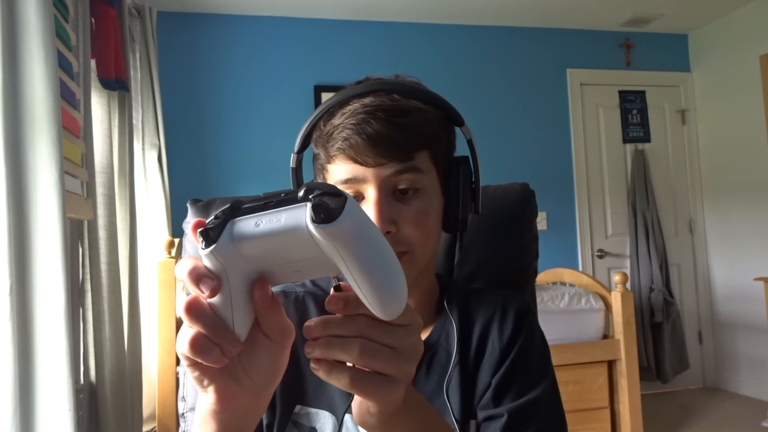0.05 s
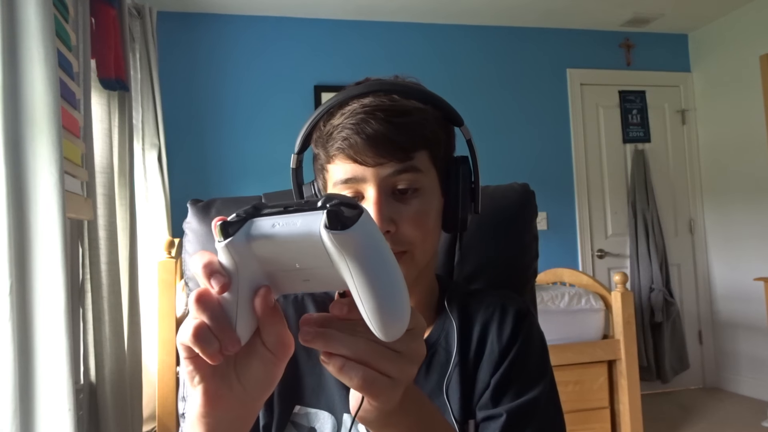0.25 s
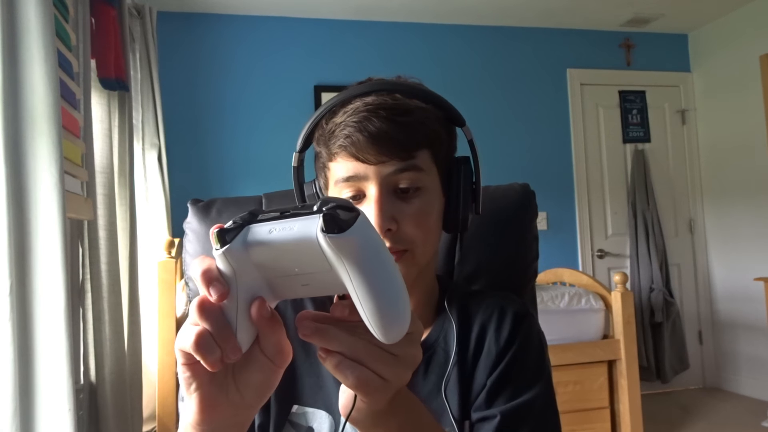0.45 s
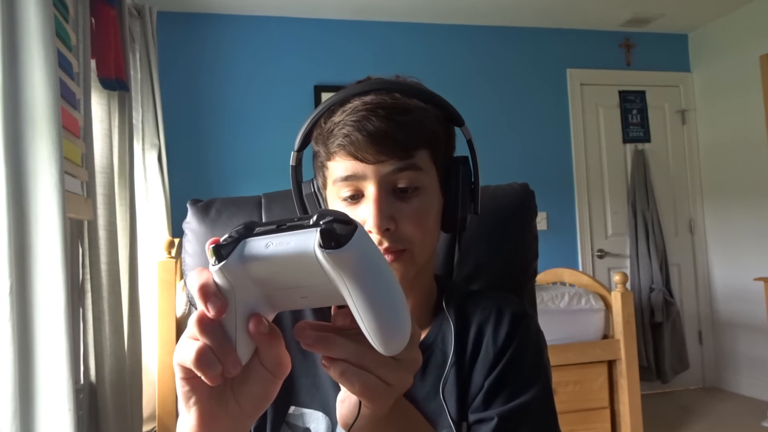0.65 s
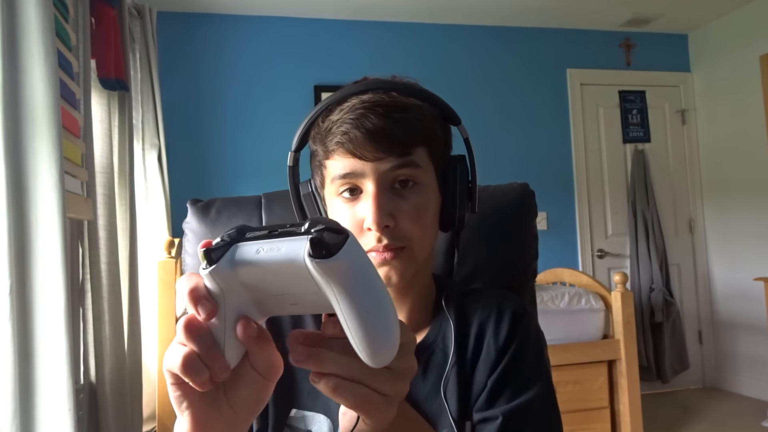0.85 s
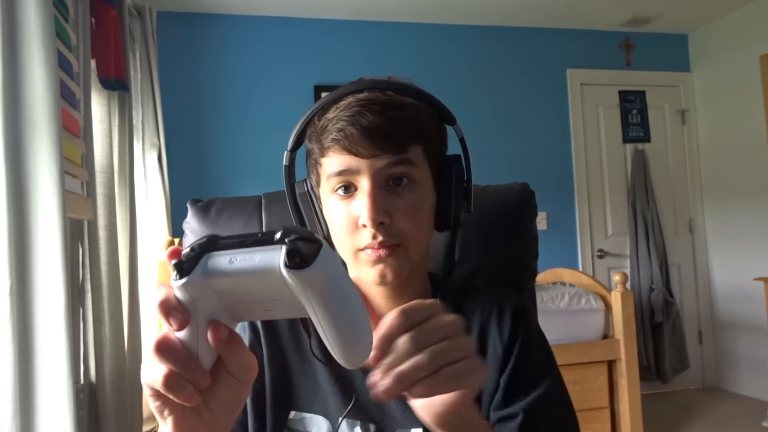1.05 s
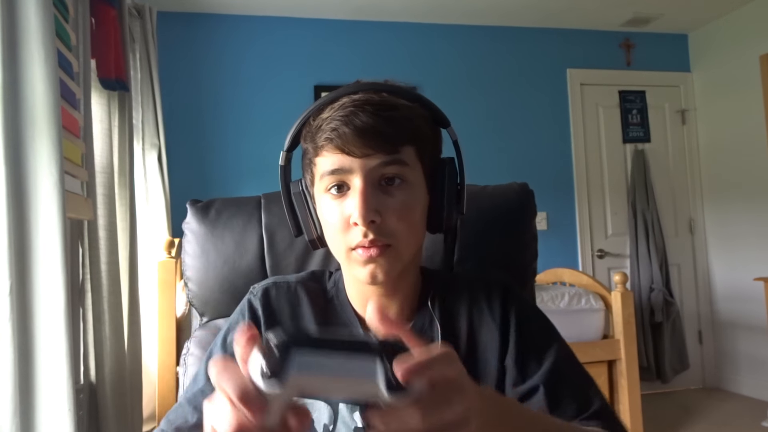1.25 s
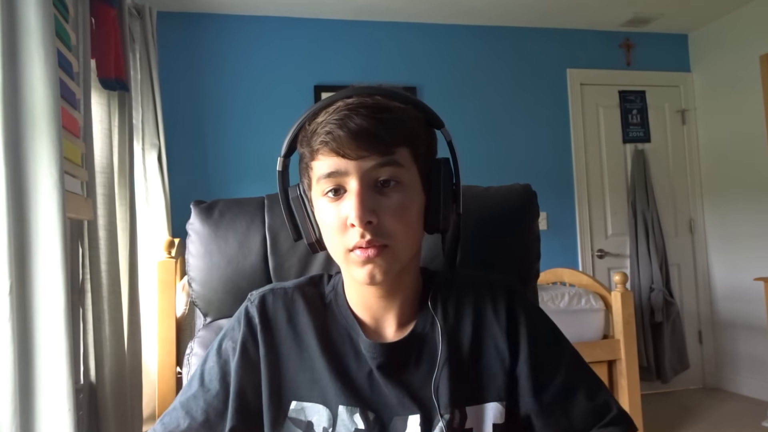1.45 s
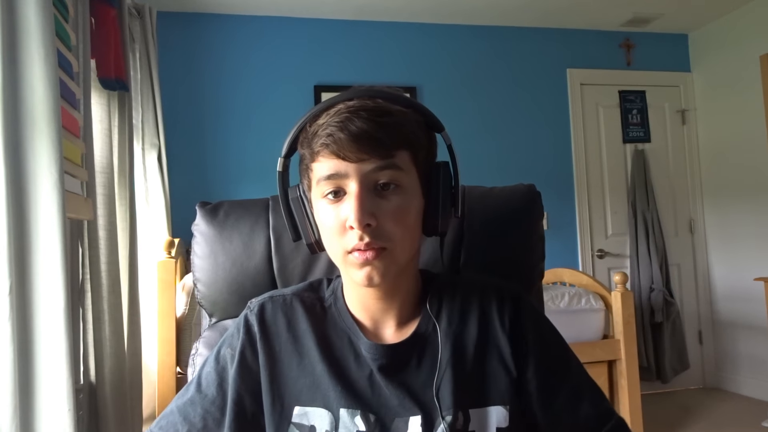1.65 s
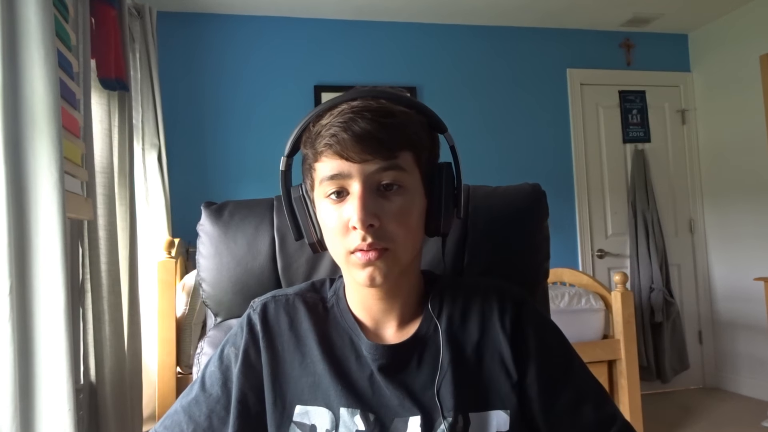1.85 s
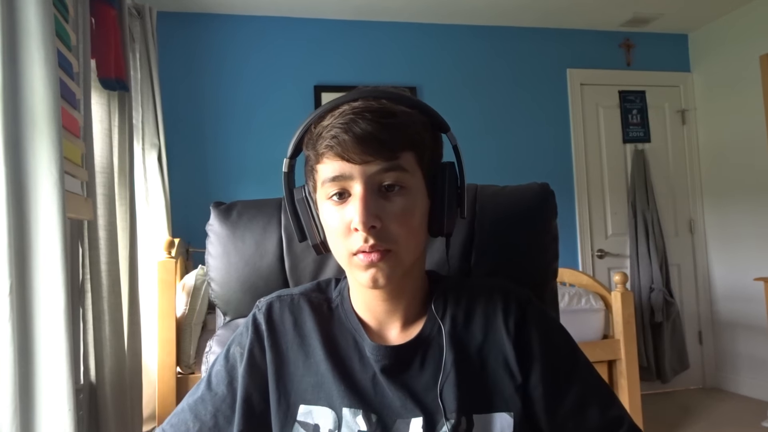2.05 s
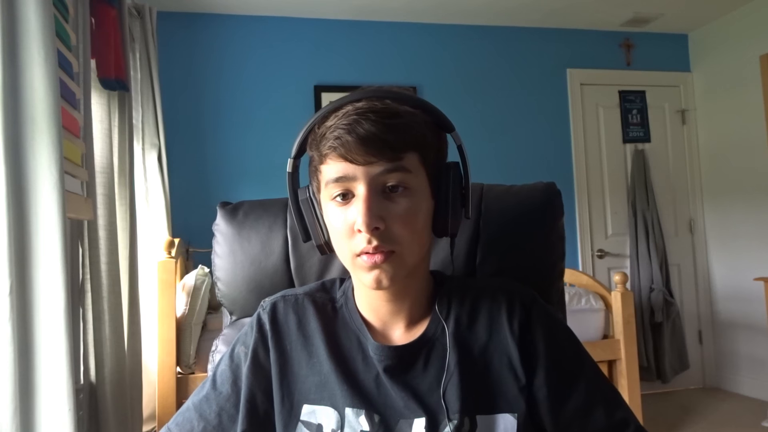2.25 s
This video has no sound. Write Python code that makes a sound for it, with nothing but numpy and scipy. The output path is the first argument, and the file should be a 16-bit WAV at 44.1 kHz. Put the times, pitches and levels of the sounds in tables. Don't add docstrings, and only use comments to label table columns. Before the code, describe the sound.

Game controller plastic clicks and snaps as a plug goes in, then handling knocks and a press

```python
import sys
import numpy as np
from scipy import signal
from scipy.fft import rfft, irfft, next_fast_len
from scipy.io import wavfile
from scipy.ndimage import uniform_filter1d

SR = 44100
rng = np.random.default_rng(int(sys.argv[2]) if len(sys.argv) > 2 else 0)


def generate_wav(signal):
    frames = np.transpose(np.atleast_2d(signal))
    scaled = np.clip(frames, -1, 1) * 32767
    pcm = np.round(scaled).astype(np.int16)
    wavfile.write(sys.argv[1], SR, pcm)


def volts_from_db(level):
    exponent = np.asarray(level, float) / 20
    return 10 ** exponent


N = 99225


def unit(x):
    return x / np.sqrt(np.mean(x ** 2) + 1e-20)


def peak(x):
    return x / np.abs(x).max()


def along(points, hz):
    f, v = np.transpose(points)
    return np.interp(np.log(hz + 1), np.log(f + 1), v)


def filtered(x, response):
    m = 2 * next_fast_len(x.shape[-1] // 2 + SR // 8)
    return irfft(rfft(x, m) * response(np.fft.rfftfreq(m, 1 / SR)), m)[..., :x.shape[-1]]


def causal(points):
    def response(hz):
        cepstrum = irfft(np.log(volts_from_db(along(points, hz)) + 1e-6))
        half = len(cepstrum) // 2
        cepstrum[1:half] *= 2
        cepstrum[half + 1:] = 0
        return np.exp(rfft(cepstrum))
    return response


def spread(pair, alike):
    def mid_and_side(hz):
        turn = np.arccos(np.clip(along(alike, hz), -1, 1)) / 2
        return np.array([np.cos(turn), np.sin(turn)])
    mid, side = filtered(pair, mid_and_side)
    return np.array([mid + side, mid - side])


def steady_noise(spectrum, db):
    # frequency in Hz, left-right likeness.
    likeness = [(60, 0.9), (230, 1), (870, 0.12), (3320, 0.05), (12700, 0.013)]
    noise = filtered(rng.standard_normal((2, N)), lambda hz: volts_from_db(along(spectrum, hz)))
    return volts_from_db(db) * unit(spread(noise, likeness))


def hiss():
    # frequency in Hz, level in dB per Hz.
    hiss_spectrum = [(200, -33.5), (400, -13), (640, -2), (2000, -4.5), (4400, -7), (6300, -11.5),
                     (10900, -19), (11600, -68)]
    return steady_noise(hiss_spectrum, -63)


def rumble():
    # frequency in Hz, level in dB per Hz.
    rumble_spectrum = [(20, -18), (100, -9), (300, 0), (450, -6), (900, -80)]
    return steady_noise(rumble_spectrum, -90.5)


def resonant(x, peaks):
    def response(f):
        return sum((-1) ** k * volts_from_db(db) * 1j * f * width / (hz * hz - f * f + 1j * f * width)
                   for k, (hz, width, db) in enumerate(peaks))
    return filtered(x, response)


def blurred(peaks):
    widen = 1.075
    def response(f):
        return np.sqrt(sum(volts_from_db(2 * db) / (1 + ((hz * hz - f * f) / (f * width * widen + 1)) ** 2)
                           for hz, width, db in peaks))
    return response


def contacts(rows, shell, wet_db, shift):
    # frequency in Hz, width in Hz, level in dB.
    cavity = [(900, 100, 0), (1090, 70, -7), (780, 150, -12)]
    # frequency in Hz, level in dB.
    crack_colour = [(400, -44), (800, -12), (2000, 5.5), (4000, 9.5), (8000, -9.5), (11000, -18),
                    (14000, -33), (20000, -22)]
    blow_s, crack_s = 0.0015, 0.0071
    roughness, ring_db = 0.25, 0.5
    first_answer_s = 0.0025
    round_hollow_db, round_crack_db = 17, -0.7

    toward, kicks = np.zeros(N + SR), np.zeros((3, N))
    t = np.arange(SR // 10) / SR
    hollow = [(hz * shift, width, db) for hz, width, db in cavity]
    for s, db, hollow_db, crack_db in rows:
        push = volts_from_db(-20 * t / blow_s) * roughness * rng.standard_normal(len(t)) + (t == 0)
        crack = filtered(volts_from_db(-20 * t / crack_s) * rng.standard_normal(len(t)), causal(crack_colour))
        sound = peak(resonant(push, shell))
        sound = sound + volts_from_db(hollow_db) * peak(resonant(push, hollow))
        sound = sound + volts_from_db(crack_db) * peak(crack)
        toward[round(s * SR):][:len(t)] += volts_from_db(db + ring_db) * sound
        parts_db = np.array([0, hollow_db + round_hollow_db, crack_db + round_crack_db])
        kicks[:, round((s + first_answer_s) * SR)] = volts_from_db(db + parts_db)

    def colours(f):
        return np.array([blurred(shell)(f), blurred(hollow)(f), volts_from_db(along(crack_colour, f))])
    return toward[:N], volts_from_db(wet_db + 18) * filtered(kicks, colours).sum(axis=0)


def room(toward, around):
    # frequency in Hz, time to fall 60 dB in seconds.
    decay = [(500, 0.49), (1300, 0.35), (3000, 0.32), (4400, 0.38), (6000, 0.36), (9000, 0.28)]
    # frequency in Hz, level of the tail in dB.
    tail_colour = [(10800, 30), (11500, -33)]
    # frequency in Hz, left-right likeness of the tail.
    tail_alike = [(500, 0.87), (2500, 0.59), (4500, 0.063), (10000, 0.05)]
    # delay in seconds, level in dB over the tail.
    reflections = [
        (.005, 8),
        (0.015, 6),
        (0.029, -4.5),
    ]
    # frequency in Hz, angle in radians by which each microphone port is turned.
    port_phase = [(2500, 0.15), (4500, 0.6), (10000, 0.84)]
    left_db, left_treble_db = 0.96, -0.5
    start_s, rise_s, wall_rise_s, scatter_s = 0.0013, 0.018, 0.0009, 0.0032

    hz, t, z = signal.stft(rng.standard_normal((2, SR // 2)), SR, nperseg=256)
    fall_db = along(tail_colour, hz)[:, None] - 60 * t / along(decay, hz)[:, None]
    tail = signal.istft(z * volts_from_db(fall_db), SR, nperseg=256)[1]
    t = np.arange(tail.shape[1]) / SR
    walls = sum(volts_from_db(db) * np.clip((t - s) / wall_rise_s, 0, 1) * np.exp(-np.abs(t - s) / scatter_s)
                for s, db in reflections)
    tail = spread(tail, tail_alike) * (np.clip((t - start_s) / rise_s, 0, 1) + walls)

    def ports(hz):
        sign = np.array([[1], [-1]])
        lean = along([(2000, left_db), (11000, left_db + left_treble_db), (12000, 4.8)], hz)
        return volts_from_db(sign * lean) * np.exp(1j * sign * along(port_phase, hz))
    answer = signal.fftconvolve(around[None], tail / np.linalg.norm(tail[0]), axes=1)[:, :N]
    return filtered(toward, ports) + answer


def handled(rows, shell, group):
    # plug in, snap, fumble, grip, knock, press, scrape.
    # Strength of the room's answer in dB.
    wet_db = [-8.5, -7.5, -11.5, -12.5, -12.5, -10, -10]
    hollow_shift = [1.05, 0.97, 0.89, 0.96, 0.99, 1.03, .95]
    dull_db = [-6, 0, -1, -1, 0.5, -1, -3]
    heard = room(*contacts(rows, shell, wet_db[group], hollow_shift[group]))
    shade = dull_db[group]
    return filtered(heard, causal([(5000, 0), (8000, shade), (13000, 2 * shade)]))


def scrape():
    blows = [(0.2324, -32.5, -25, 0.5), (0.2339, -29.5, -13.5, -3), (0.2364, -31.5, -15, -8),
             (.239, -38, -4, -11), (.245, -31.5, -16, -12), (0.248, -35.5, -28, -10),
             (0.2571, -39, -8, -10), (0.2584, -33, -16, -8), (0.2605, -31, -8.5, -14),
             (0.2606, -27, -15, -19)]
    shell = [(1750, 450, 2), (2400, 500, 4), (3100, 550, 5), (3800, 500, -2), (4700, 400, -3)]
    return handled(blows, shell, 6)


def plug_in():
    blows = [(0.2711, -21.5, -19.5, -7), (0.2735, -23.5, -23, -14), (0.2772, -21, -38, -2.5),
             (0.278, -14.5, -34, -4.5), (.279, -20.5, -21, -8), (0.2926, -18.5, -22, -11.5),
             (0.2953, -24, -21, -8), (.2985, -26, -14.5, -18), (.3025, -22.5, -32, -2.5)]
    shell = [(1950, 200, -7), (2300, 250, -12), (2910, 150, 0), (3450, 350, -10), (4180, 300, -5),
             (5000, 700, -21), (7240, 900, -25)]
    return handled(blows, shell, 0)


def snap():
    blows = [(0.5844, -14, -23.5, -9), (.5856, -19.5, -30, -21), (0.5899, -27.5, -7, -18),
             (.5925, -34.5, -13, -15), (.605, -28, -25, -3.5), (.6155, -26.5, -24, -7),
             (.637, -30.5, -15, -8)]
    shell = [(1850, 330, 8), (2500, 330, 5), (3280, 500, -8), (4730, 500, -2), (6200, 600, -2),
             (8260, 1800, -5)]
    return handled(blows, shell, 1)


def fumble():
    blows = [(.848, -63, -29, 9), (.853, -55, -28, 5), (0.9312, -45.5, -9.5, -31), (0.989, -55, -11, 5.5),
             (1.002, -48.5, -2, -22), (1.021, -41.5, -6, -3), (1.0252, -46, 9, -14), (1.046, -38, -15, -13),
             (1.0478, -41, -18, -11), (1.073, -50, -2, -15)]
    shell = [(1850, 260, 6), (3000, 260, 5), (3700, 400, -4)]
    return handled(blows, shell, 2)


def grip():
    blows = [(1.2171, -34, -25, -6), (1.222, -29.5, -14, -3.5), (1.227, -30.5, -22, -19),
             (1.233, -29.5, -36, -25), (1.239, -44, -13, -24), (1.4135, -44, -15, 1)]
    shell = [(1600, 300, -2), (2300, 400, 3), (3010, 300, 11), (4000, 700, 4), (6330, 600, -8),
             (7700, 700, -2)]
    return handled(blows, shell, 3)


def knock():
    blows = [(1.5775, -25.5, -12, -6), (1.5783, -8.5, -18.5, -10.5), (1.582, -22, -8, -14),
             (1.5863, -22.5, -15.5, -4), (1.597, -28, -10, -13), (1.608, -26, -20, -18),
             (1.653, -32, -18, -21), (1.6605, -41, 0.5, -5), (1.666, -44, 5.5, -2)]
    shell = [(1750, 260, 1), (2200, 280, 0), (2940, 500, 3), (3650, 500, 0), (4400, 550, -2),
             (5520, 450, -12), (7140, 400, -17)]
    return handled(blows, shell, 4)


def press():
    blows = [(1.9734, -22, -21.5, -6.5), (1.9755, -23.5, -21, -10), (1.9783, -23, -24, -17),
             (1.981, -28.5, -13, -6), (1.9826, -24.5, -12.5, -6.5), (1.991, -35, -12, -1),
             (1.994, -34.5, -10, -5), (2.052, -41, -11, -5), (2.0553, -32, -16, -13), (2.063, -36, -7, -21),
             (2.066, -42, -4, -7), (2.073, -44.5, 5, -24)]
    shell = [(2006, 224, 3), (2994, 250, 3), (3420, 250, 0), (4320, 460, -8.5), (6000, 620, -14)]
    return handled(blows, shell, 5)


def thuds():
    # start in seconds, length in seconds, level in dB.
    jolts = [
        (.275, .06, -86),
        (.585, 0.026, -86),
        (1.579, .04, -86),
        (1.975, .02, -90),
        (2.05, .03, -90),
    ]
    t = np.arange(N) / SR
    shake = sum(volts_from_db(db) * (t > s) * np.exp(-np.abs(t - s) / length) for s, length, db in jolts)
    return shake * steady_noise([(20, -3), (150, 0.5), (350, -6), (600, -50)], 0)


def squeak(s, length, from_hz, to_hz, db):
    t = np.arange(N) / SR
    u = np.clip((t - s) / length, 0, 1)
    jitter_hz = 30 * unit(uniform_filter1d(rng.standard_normal(N), size=150))
    flutter = 1 + 0.3 * unit(uniform_filter1d(rng.standard_normal(N), size=200))
    hz = from_hz + (to_hz - from_hz) * u + jitter_hz
    return volts_from_db(db) * np.sin(np.pi * u ** 0.45) * flutter * np.sin(2 * np.pi * np.cumsum(hz) / SR)


def fingers():
    # time in seconds, strength in dB.
    strokes = [
        [(0.72, -80), (0.784, -61), (0.94, -62), (0.98, -93), (0.986, -62), (1.044, -68), (1.102, -67.5),
         (1.208, -62.5), (1.215, -41)],
        [(1.24, -47), (1.244, -70), (1.272, -63), (1.29, -46.5), (1.356, -58.5), (1.418, -51.5), (1.5, -53.5),
         (1.55, -48.5), (1.565, -50)],
    ]
    # time in seconds, strength in dB.
    settling = [(1.7, -55.5), (1.908, -69.5), (1.96, -88)]
    # frequency in Hz, level in dB per Hz.
    skin = [(240, -46), (400, -31.5), (815, 5), (1200, -9.5), (1780, 2), (2890, 2.5), (10600, -8.5),
            (11200, -13), (12000, -56), (15600, -100), (22000, -120)]
    # start in seconds, length in seconds, first pitch in Hz, last pitch in Hz, level in dB.
    squeaks = [
        (1.411, 0.056, 810, 940, -51),
        (.988, 0.028, 800, 850, -54),
    ]
    grains_per_s, grain_spread_db, rub_db, room_db = 3000, 1.5, -3.73, -7

    s, db = np.transpose(np.vstack([*strokes, [(1.58, -64)], settling]))
    strength_db = np.interp(np.arange(N) / SR, s, db, left=-120, right=-120)
    slips = (rng.random(N) < grains_per_s / SR) * rng.standard_normal(N)
    slips = slips * volts_from_db(grain_spread_db * rng.exponential(size=N))
    grains = unit(slips) + 0.98 * rng.standard_normal(N)
    grains = unit(filtered(grains, lambda hz: volts_from_db(along(skin, hz))))
    out = grains * volts_from_db(rub_db + strength_db) + sum(squeak(*row) for row in squeaks)
    return out, volts_from_db(room_db) * out


def microphone(x):
    # frequency in Hz, level in dB.
    capsule = [(60, -22.5), (400, -34), (600, -17.5), (780, -5.5), (1000, 1), (10800, 1.5), (11400, -15),
               (13500, -25), (15000, -83)]
    return filtered(x, causal(capsule))


def scene():
    pad = scrape() + plug_in() + snap() + fumble() + grip() + knock() + press()
    pad = pad + room(*fingers())
    return microphone(pad) + hiss() + rumble() + thuds()


def band_limit(x):
    return signal.sosfilt(signal.butter(12, 13270, fs=SR, output="sos"), x)


def record(dry):
    # start in seconds, end in seconds, lowest muted frequency in Hz, share removed.
    hushes = [
        (.575, .5815, 2700, .7),
        (1.9615, 1.97, 1600, .96),
    ]
    t = np.arange(N) / SR
    for start, end, hz, share in hushes:
        shut = uniform_filter1d(((t > start) & (t < end)) * 1.0, size=60)
        treble = filtered(dry, lambda f: np.clip((f - hz) / 600 + 0.5, 0, 1))
        dry = dry - share * shut * treble
    return band_limit(dry)


dry = scene()
out = record(dry)
generate_wav(out)
```